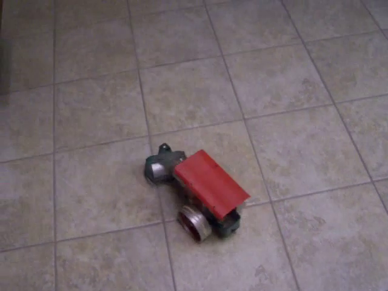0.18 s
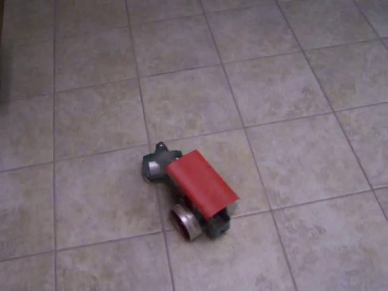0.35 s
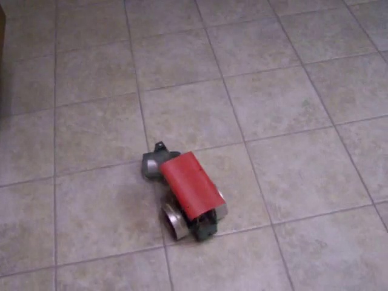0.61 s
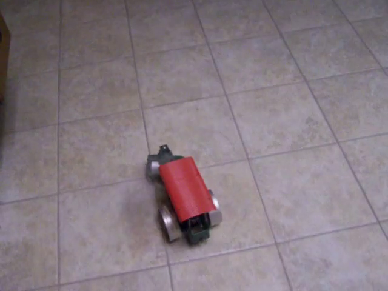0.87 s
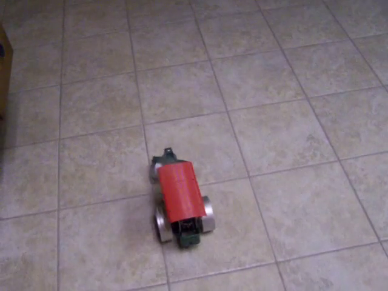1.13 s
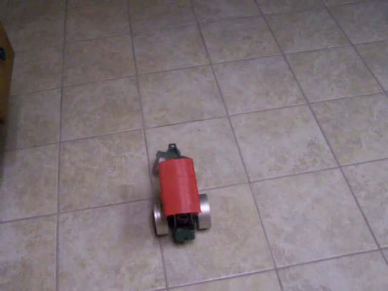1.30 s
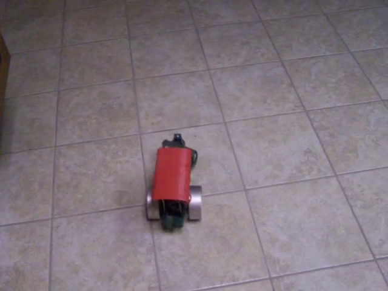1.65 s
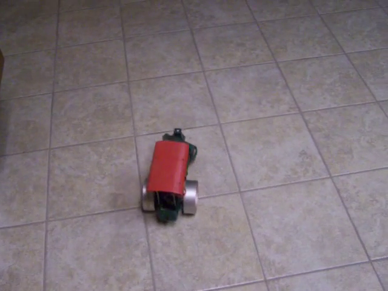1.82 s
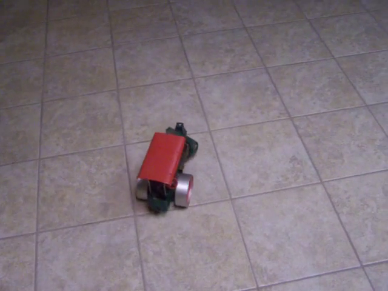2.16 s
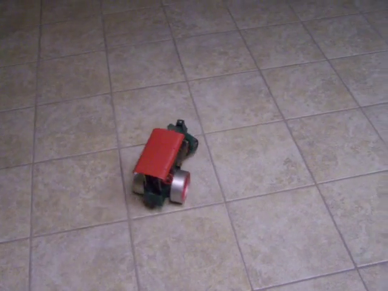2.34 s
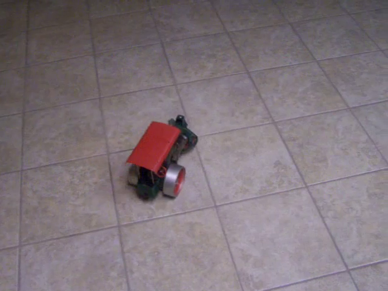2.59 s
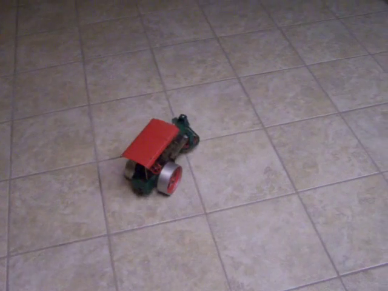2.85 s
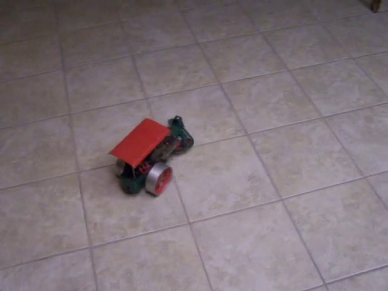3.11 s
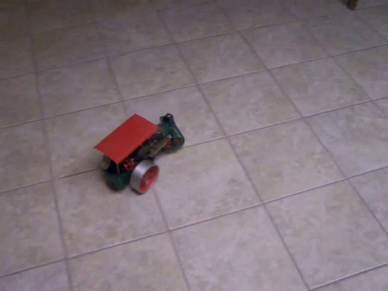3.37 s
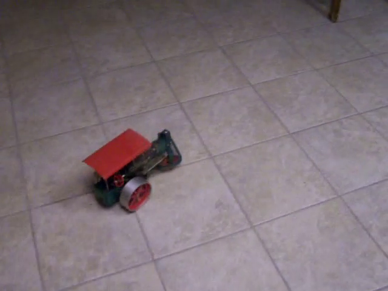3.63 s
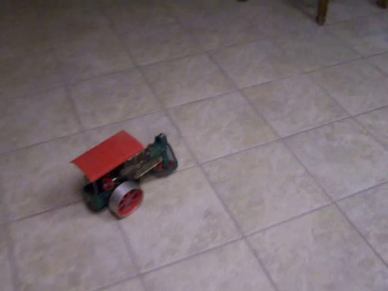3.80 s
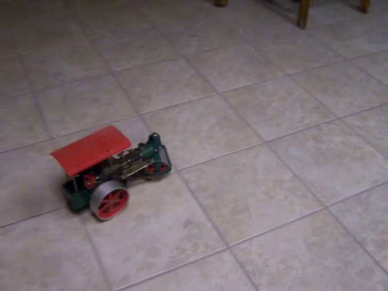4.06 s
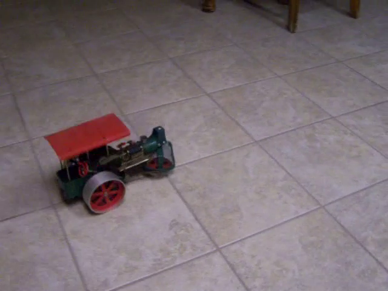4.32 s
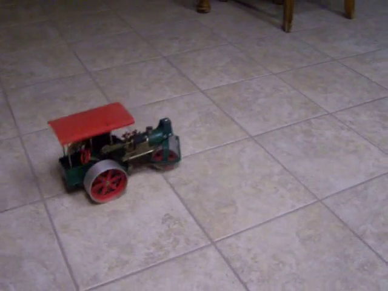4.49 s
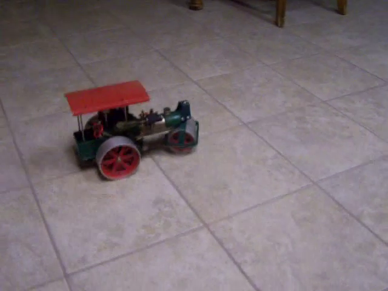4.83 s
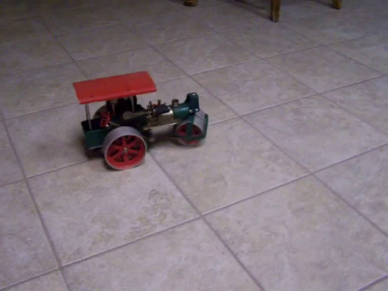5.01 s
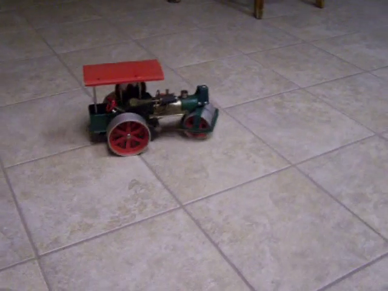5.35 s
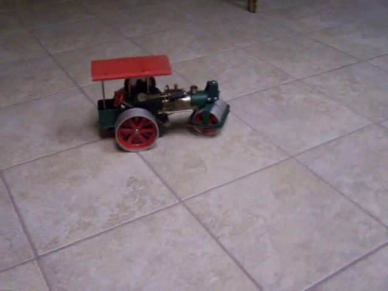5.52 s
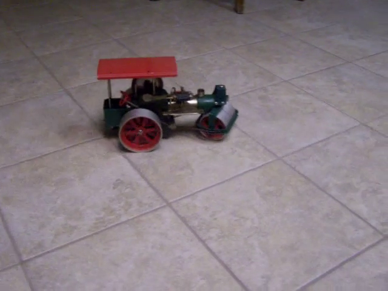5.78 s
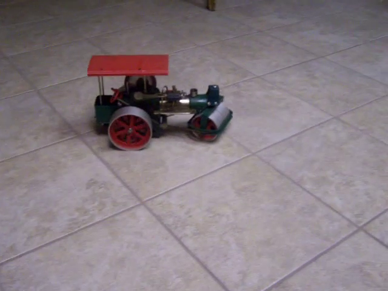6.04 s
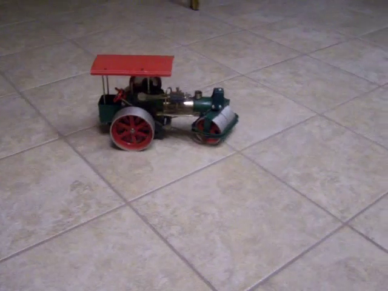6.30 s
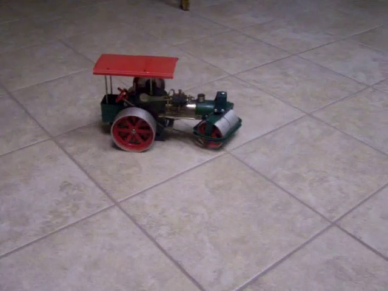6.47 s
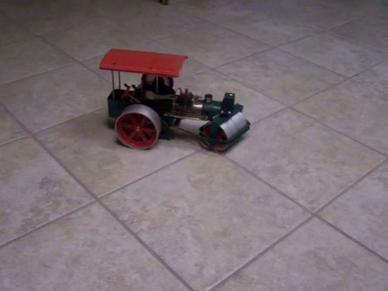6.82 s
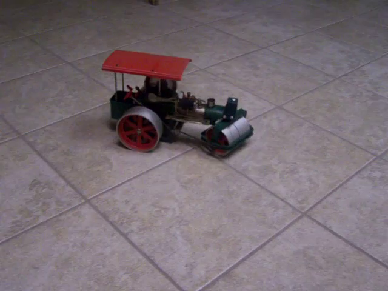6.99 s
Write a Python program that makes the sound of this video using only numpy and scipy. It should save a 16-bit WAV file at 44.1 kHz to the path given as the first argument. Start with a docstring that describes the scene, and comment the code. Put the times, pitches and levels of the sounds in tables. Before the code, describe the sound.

Continuous bright metallic rattling from a small steam-driven roller, with fast fluttering puffs at about nine per second and a low grainy wheel rumble. A loose steel part repeatedly chatters with a piercing, rough, beating ring, and sharp clicks land unevenly. Thin panel tones shift subtly as it turns. Close, band-limited camera pickup in a lightly echoing tiled room, its level dipping after loud knocks.

```python
"""A tiled room: a toy steam roller runs in a slow curve across the floor, close to a small camera.
Loose gears clatter in the tin body and steam puffs with each crank turn: random contacts and noise, filtered.
Wheels rumble on the tiles, thin panels sing as they turn past, and a steel part clinks and chatters as a
beating tone pair with overtones. Faint steady tones lie under it all, with one soft bump.
The camera's gain control ducks the whole mix at loud moments, and its treble is band-limited."""
import sys
import numpy as np
from scipy import signal
from scipy.fft import rfft, irfft, next_fast_len
from scipy.io import wavfile
from scipy.ndimage import uniform_filter1d, map_coordinates

SR = 44100
rng = np.random.default_rng(int(sys.argv[2]) if len(sys.argv) > 2 else 0)


def store_wav(level_fs):
    """Save 16-bit WAV to argv[1]."""
    pcm = np.round(np.clip(np.atleast_2d(level_fs), -1, 1) * 32767)
    wavfile.write(sys.argv[1], SR, pcm.T.astype(np.int16))


N = 315756
TIME = np.arange(N) / SR  # s

# the way the roller points, 0 = straight away, 90 = side on: (time [s], heading [deg])
HEADING = [(0, -50), (1.5, 0), (3, 35), (5, 80), (7.2, 100)]


def amp(db):
    """Decibels to gain."""
    return 10 ** (np.asarray(db) / 20)


def unit(x):
    """Scale to rms 1."""
    return x / np.sqrt(np.mean(x ** 2) + 1e-20)


def along(points, hz):
    """Read (frequency [Hz], value) points on a log frequency axis."""
    point_hz, values = np.transpose(points)
    return np.interp(np.log(hz + 1), np.log(point_hz + 1), values)


def curves(rows):
    """Interpolate each column after the time to one value per sample."""
    time_s, *columns = np.transpose(rows)
    return [np.interp(TIME, time_s, column) for column in columns]


def wobble(rate_hz):
    """Smooth random curve through rate_hz knots a second."""
    knots = rng.standard_normal(int(N * rate_hz / SR) + 4)
    return map_coordinates(knots, [TIME * rate_hz])


def filtered(x, response):
    """Pass x through a complex response of frequency."""
    size = next_fast_len(N + SR // 2)
    spectrum = rfft(x, size) * response(np.fft.rfftfreq(size, 1 / SR))
    return irfft(spectrum, size)[:N]


def coloured(x, points, size=4096):
    """Minimum-phase filter through (frequency [Hz], level [dB]) points; the result has rms 1."""
    gain = amp(along(points, np.fft.rfftfreq(size, 1 / SR)))
    cepstrum = irfft(np.log(gain))
    # folding the cepstrum makes the filter causal
    cepstrum[1:size // 2] *= 2
    cepstrum[size // 2 + 1:] = 0
    kernel = irfft(np.exp(rfft(cepstrum)))
    return unit(signal.fftconvolve(x, kernel)[:N])


def resonate(x, modes):
    """Ring parallel (centre [Hz], width [Hz], level [dB]) resonances; the result has rms 1."""
    def response(f):
        return sum(amp(db) * 1j * f * width / (centre * centre - f * f + 1j * f * width)
                   for centre, width, db in modes)
    return unit(filtered(x, response))


def impacts(rate_hz, scatter_db):
    """Irregular contacts of uneven strength and random sign, rate_hz a second on average; rms 1."""
    hit = rng.random(N) < rate_hz / SR
    strength = amp(scatter_db * np.clip(rng.standard_normal(N), -2, 2))
    return unit(hit * strength * rng.choice([-1, 1], N))


def ring_on(x, t60_s):
    """Crowded sheet-metal modes: noise that follows the decaying energy of each contact; rms 1."""
    t = np.arange(SR // 10) / SR
    decay = amp(-60 * t / t60_s)
    energy = np.abs(signal.oaconvolve(x ** 2, decay ** 2)[:N])
    return unit(np.sqrt(energy) * rng.standard_normal(N))


def diffuse(x, t60_s, count, delay_s=0):
    """Dense decaying noise tail, drawn anew in each of count stretches as the roller moves on."""
    t = np.arange(SR // 2) / SR
    out = np.zeros(N + SR)
    for block in np.array_split(np.arange(N), count):
        tail = rng.standard_normal(len(t)) * amp(-60 * t / t60_s) * (t >= delay_s)
        piece = signal.fftconvolve(x[block], tail / np.linalg.norm(tail))
        out[block[0]:][:len(piece)] += piece
    return out[:N]


def steady_tones():
    """Faint steady tones, from a low hum up to the midrange: sines whose phase drifts slightly."""
    # (frequency [Hz], rms level [dB])
    faint_lines = [(120, -61.5), (151, -65.5), (360, -52), (580, -57), (820, -63.5)]
    return sum(amp(db) * np.sqrt(2) * np.sin(2 * np.pi * hz * TIME + 0.22 * wobble(3.4))
               for hz, db in faint_lines)


def room(x):
    """The tiled room's short reverberation: a diffuse tail after a small delay."""
    return diffuse(x, t60_s=0.47, count=10, delay_s=.005)


def bump():
    """A dull, low bump: overlapping Gaussian swells of narrow-band noise."""
    # (centre time [s], frequency [Hz], level [dB], Gaussian sigma [s])
    thuds = [(5.838, 300, -39, 0.053), (5.869, 133, -37, 0.018)]
    out = np.zeros(N)
    for centre_s, hz, db, sigma_s in thuds:
        swell = amp(db) * np.exp(-.5 * ((TIME - centre_s) / sigma_s) ** 2)
        band = [(hz / 2, -30), (hz, 0), (hz * 2.7, -30)]
        out += swell * coloured(rng.standard_normal(N), band)
    return out


def wheels():
    """Bare metal rims roll over the grain of the tiles: random contacts drive rumble and frame resonances."""
    # rumble over time, including dips where the gain ducks: (time [s], relative level [dB])
    rumble_level = [(0.0, -33), (0.42, -38), (0.48, -48), (0.54, -36.5), (1.62, -37.5), (1.79, -47),
                    (2.13, -38.5), (2.93, -36), (2.95, -41), (3.47, -41), (3.55, -35.5), (4.69, -42),
                    (5.8, -38.5), (5.82, -37), (5.96, -44.5), (6.78, -35), (6.82, -42), (7.16, -39.5)]
    # rumble spectrum: (frequency [Hz], relative level [dB])
    rumble_colour = [(20, -4.5), (75, -10.5), (130, -10.5), (205, -3), (270, -2.5), (390, -5.5), (460, 2),
                     (600, 0.5), (720, -7), (850, -6.5), (1300, -7), (3000, -35)]
    # wheel and frame resonances: (centre [Hz], width [Hz], relative level [dB])
    frame_modes = [(456.4, 17, 4), (568, 41, -1), (804, 10, 3.5)]
    rumble_db, = curves(rumble_level)
    rumble = coloured(impacts(rate_hz=3000, scatter_db=4.5), rumble_colour)
    frame = resonate(impacts(rate_hz=2500, scatter_db=1.0), frame_modes)
    return amp(rumble_db - 4.0) * (rumble + amp(-3.5) * frame)


def panels():
    """Thin body panels ring as narrow-band noise; each beam sweeps past the camera as the roller turns."""
    # (loudest heading [deg], centre [Hz], width [Hz], relative level [dB])
    panel_modes = [(-54, 2434, 150, -28), (1, 200, 44, -49.5), (4.5, 815, 29, -48), (-7.5, 1690, 81, -34.5),
                   (7, 1790, 130, -35), (50.5, 2600, 170, -32.5), (70, 5380, 140, -36.5),
                   (66, 1243, 62, -42), (75.5, 510, 120, -47), (84.5, 2370, 150, -33.5),
                   (102.5, 630, 53, -46), (103.5, 970, 53, -41.5), (108, 1490, 110, -32.5)]
    beam_2khz_deg = 16.2  # beam sigma at 2 kHz; lower notes spread wider
    heading_deg, = curves(HEADING)
    out = np.zeros(N)
    for facing_deg, hz, width_hz, db in panel_modes:
        b, a = signal.iirpeak(hz, hz / width_hz, SR)
        ring = unit(signal.lfilter(b, a, rng.standard_normal(N)))
        spread_deg = beam_2khz_deg * np.sqrt(2000 / hz)
        beam = np.exp(-.5 * ((heading_deg - facing_deg) / spread_deg) ** 2)
        out += amp(db + 1.7 * wobble(9)) * beam * ring
    return out


def knocks(steel_hz=3940, steel_t60_s=0.027, click_t60_s=.006):
    """Hard contacts: a decaying noise click in the gears plus a short sine ring of the steel part."""
    # (time [s], relative click peak [dB], relative steel ring [dB])
    hard_contacts = [(0.7049, -12, -10), (1.0463, -10.5, 0), (1.401, -7.5, -36), (1.467, -11.5, -36),
                     (1.601, -10, -27), (1.725, -16.5, -2.5), (1.7596, -12, -6), (1.8621, -14, -4),
                     (2.6126, -14.5, -5.5), (3.036, -12, -6.5), (4.148, -9, -10), (4.7242, -8, -7.5),
                     (5.277, -6, -18), (5.695, -7.5, -9), (6.8569, -6, -2.5), (7.0535, -9, -9)]
    click_colour = [(500, -29), (1500, -4.0), (4000, 9.5), (8000, -20)]  # Hz, dB
    t = np.arange(SR // 10) / SR
    onset = 1 - np.exp(-t / .0005)
    ring = np.sin(2 * np.pi * steel_hz * t) * amp(-60 * t / steel_t60_s) * onset
    out = np.zeros(N + SR)
    for start_s, click_db, ring_db in hard_contacts:
        burst = rng.standard_normal(len(t)) * amp(-60 * t / click_t60_s)
        click = coloured(burst, click_colour)[:len(t)]
        click /= np.abs(click).max()
        out[round(start_s * SR):][:len(t)] += amp(click_db) * click + amp(ring_db) * ring
    return out[:N]


def chatter(rise_s=0.0015, fall_t60_s=0.021, dulling_t60_s=0.37):
    """A loose steel part chatters: a rough beating ring whose overtones dull, lingering after each bout."""
    # bouts: (start [s], length [s], relative ring level [dB], relative overtone level [dB])
    bouts = [(.445, 0.013, -17.5, -32), (0.486, 0.076, -28, -42.5), (0.671, 0.062, -20, -40.5),
             (0.759, .08, -22.5, -50.5), (1.047, 0.0025, -12.5, -26.5), (1.067, 0.027, -20, -42),
             (1.131, 0.078, -27, -50), (1.658, 0.035, -20, -45.5), (1.729, .09, -21.5, -36),
             (1.854, 0.13, -18, -42), (2.369, .1, -20.5, -44), (2.614, .02, -20.5, -36),
             (2.667, .04, -25, -37.5), (2.893, 0.056, -27, -34.5), (3.037, .115, -14, -26),
             (3.292, .145, -14.5, -42.5), (3.977, 0.028, -16, -34), (4.151, 0.1, -22.5, -49),
             (4.271, .085, -15.5, -38.5), (4.526, 0.02, -13.5, -32), (5.6, 0.034, -36, -39.5),
             (5.862, .02, -20.5, -35.5), (5.903, .018, -14.5, -37), (6.145, 0.039, -15.5, -42.5),
             (6.725, 0.0086, -29, -37.5), (6.856, 0.037, -18.5, -28), (6.946, 0.058, -25, -56)]
    # close pair that beats: (frequency [Hz], level from behind [dB], level side on [dB])
    steel_pair = [(3897, 0, -8), (3968, -9, 0)]
    # (centre [Hz], width [Hz], relative level [dB])
    overtone_modes = [(5330, 120, -6), (6995, 22, 3), (7650, 120, 4), (8370, 130, -1)]
    linger_db, linger_t60_s = -12, .4  # free ring after a bout
    flutter_rad, idle_db = .25, -37  # fast phase flutter; relative ring from the shaking alone

    ring = amp(idle_db + 2.5 * wobble(12))
    bright = np.zeros(N)
    for start_s, length_s, ring_db, overtone_db in bouts:
        age_s = np.maximum(TIME - start_s, 0)
        after_s = np.maximum(TIME - start_s - length_s, 0)
        fall = amp(-60 * after_s / fall_t60_s)
        linger = amp(linger_db - 60 * after_s / linger_t60_s)
        bout = np.minimum(age_s / rise_s, 1) * np.maximum(fall, linger)
        ring = np.maximum(ring, amp(ring_db) * bout)
        bright = np.maximum(bright, amp(overtone_db - 60 * age_s / dulling_t60_s) * bout)

    side_on = np.sin(np.radians(curves(HEADING)[0])) ** 6
    pair = np.zeros(N)
    for hz, behind_db, side_db in steel_pair:
        level = amp(behind_db) * (1 - side_on) + amp(side_db) * side_on
        phase_rad = flutter_rad * wobble(220) + 1.1 * wobble(17)
        pair += level * np.sin(2 * np.pi * hz * TIME + phase_rad)
    tone = unit(amp(1.4 * wobble(300)) * pair)  # fast level flutter roughens the ring
    overtones = resonate(impacts(rate_hz=1200, scatter_db=3.5), overtone_modes)
    return amp(-.3) * ring * tone + amp(0.6) * bright * overtones


def engine():
    """Gear teeth knock in the tin body and steam escapes, both strongest on the piston's power stroke."""
    # (time [s], crank speed [turns/s])
    crank = [(0, 9), (1.2, 8.48), (2, 9.35), (3.6, 9.4), (4.5, 9.05), (5.4, 9.38), (6.2, 8.65), (7.2, 8.6)]
    # levels over time, including ducked moments:
    # (time [s], relative gear clatter [dB], relative steam and fine rattle [dB])
    clatter_level = [(0.0, -17, -19.5), (0.04, -21.5, -26.5), (0.4, -21, -26.5), (0.54, -22.5, -27),
                     (1.71, -20.5, -27), (1.75, -26.5, -31), (2.13, -21, -27.5), (3.39, -21.5, -27.5),
                     (3.47, -24.5, -33), (3.61, -21.5, -27), (4.44, -21.5, -30.5), (5.34, -22, -26.5),
                     (6.28, -22, -27.5), (6.8, -21, -25), (6.92, -24, -28.5), (7.16, -21, -25)]
    # clatter and steam spectra: (frequency [Hz], relative level [dB])
    gear_colour = [(500, -31.5), (1000, -19), (1900, -7.5), (2400, -4.5), (2950, -3.5), (3400, 1),
                   (3850, 0.5), (4250, -2.5), (4700, -9.5), (5400, -14.5), (5850, -28.5), (7600, -22.5),
                   (8500, -59)]
    hiss_colour = [(2500, -25.5), (4200, 7), (4700, 0.5), (5400, 3), (5850, -4.5), (6500, -6.5),
                   (7550, -12.5), (7900, -19), (8400, -34.5), (8900, -54.5)]
    # tin body resonances: (centre [Hz], width [Hz], relative level [dB])
    tin_modes = [(1032, 47, -6), (1149, 130, -2), (1294, 140, -0.5), (1490, 240, -0.5), (1656, 60, 6),
                 (1784, 130, -2.5)]
    crank_start_turns, tin_t60_s = 0.14, .026
    gear_swell_db, body_swell_db, steam_swell_db = .9, .5, 1.9  # on each power stroke
    gear_ratio, bind_db = 3, .3  # gears bind once per turn of a wheel that takes 3 crank turns

    (speed,), (gear_db, steam_db) = curves(crank), curves(clatter_level)
    turns = crank_start_turns + np.cumsum(speed) / SR
    stroke = np.cos(2 * np.pi * turns)
    load_db = bind_db * np.cos(2 * np.pi * turns / gear_ratio)

    contacts = impacts(rate_hz=1900, scatter_db=1.56)
    # some ring is each contact's own, some is shared by neighbours and shifts as the roller moves
    own_ring = ring_on(contacts, tin_t60_s)
    shared_ring = diffuse(contacts, tin_t60_s, count=70)
    teeth = unit(contacts + amp(-1.0) * own_ring + amp(-5.5) * shared_ring)
    gears = amp(gear_db + 0.5 + gear_swell_db * stroke) * coloured(teeth, gear_colour)
    body = amp(gear_db - 12.0 + body_swell_db * stroke) * resonate(teeth, tin_modes)

    fine = rng.standard_normal(N) + 0.65 * impacts(rate_hz=350, scatter_db=6.5)
    puff_db = steam_db - 0.56 + steam_swell_db * stroke + 1.9 * wobble(50)
    steam = amp(puff_db) * coloured(fine, hiss_colour)
    return amp(load_db) * (gears + body + steam)


def scene():
    """The roller in its room, over the steady tones and the bump."""
    roller = wheels() + panels() + knocks() + chatter() + engine()
    return (steady_tones() + bump() + amp(-8.5) * room(roller) + amp(-0.66) * roller)[None]


def gain_control(x, limit_db=-14.6, recovery_db_per_s=110):
    """Power above the limit ducks the gain within a few milliseconds; it recovers more slowly."""
    power = np.abs(uniform_filter1d(x ** 2, SR // 200))
    excess_db = np.maximum(10 * np.log10(power + 1e-12) - limit_db, 0)
    # hold each peak, falling at the recovery rate
    recovery_db = recovery_db_per_s * TIME
    cut_db = np.maximum.accumulate(excess_db + recovery_db) - recovery_db
    attack = SR // 300  # samples
    return x * amp(-signal.lfilter([1 / attack], [1, 1 / attack - 1], cut_db))


def record(dry):
    """The camera rides its gain, rolls off the treble and keeps nothing above its band limit."""
    # treble roll-off: (frequency [Hz], gain [dB])
    roll_off = [(8420, 0), (8600, -8), (8950, -26)]
    top_hz = 8950
    return filtered(gain_control(dry[0]), lambda hz: amp(along(roll_off, hz)) * (hz < top_hz))[None]


dry = scene()
out = record(dry)
store_wav(out)
```